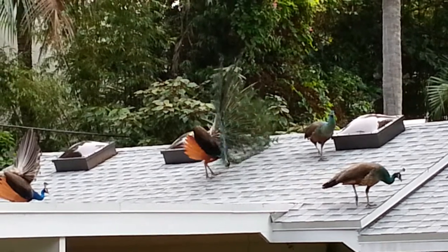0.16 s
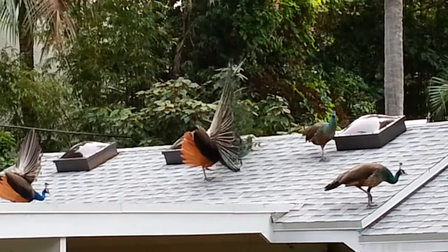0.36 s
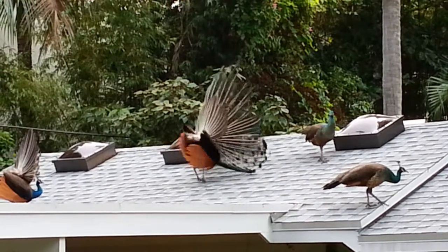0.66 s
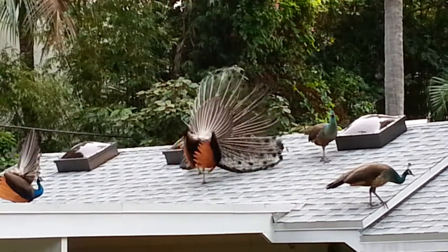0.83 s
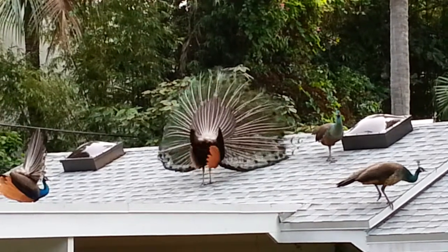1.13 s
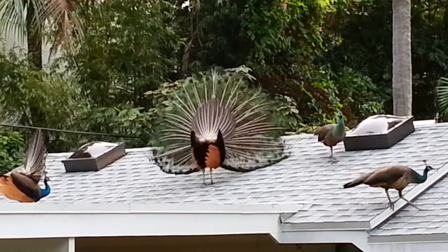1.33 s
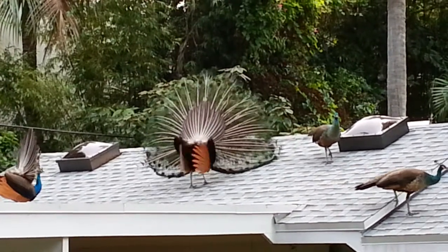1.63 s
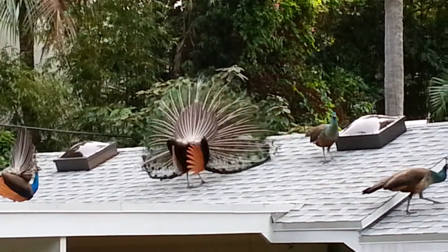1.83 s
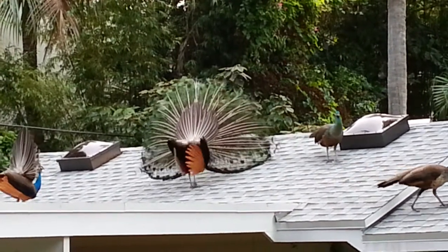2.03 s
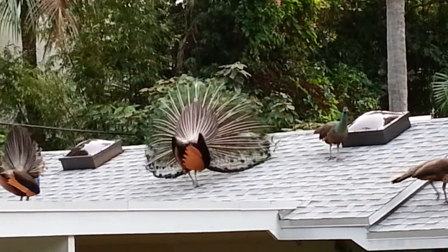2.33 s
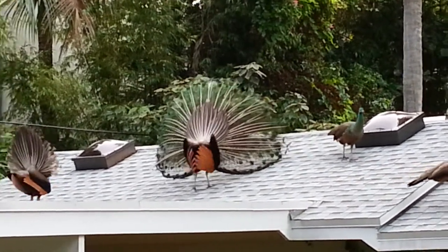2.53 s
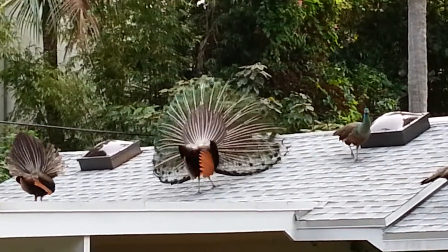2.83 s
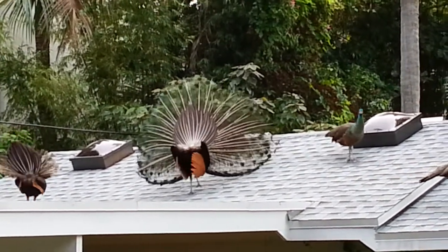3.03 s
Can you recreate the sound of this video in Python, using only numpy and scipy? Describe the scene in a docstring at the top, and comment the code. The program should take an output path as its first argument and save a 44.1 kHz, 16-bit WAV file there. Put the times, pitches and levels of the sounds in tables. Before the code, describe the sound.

Brittle, bright feather rattling comes in uneven short strokes, busy at first, sharpest near the middle with tiny squeaky scrapes, then softer and scattered; quiet outdoor place, slight reflections, low rumble and thin hiss.

```python
"""A peacock turns on a roof with its train fanned: short dry strokes of rustling, with sharp quill snaps.
Rustle is band-split noise and random impulses under stroke envelopes; each snap is a tick with a brief ring.
Filters make this crackle ring near 5 kHz on the left and 7 kHz on the right; decaying noise is its echo.
Modal knocks, squeaking two-tone scrapes and soft bumps of filtered noise join it at moments.
A low noise rumble with a faint hum of sines and a thin noise hiss lie underneath."""
import sys
import numpy as np
from scipy import signal
from scipy.fft import rfft, irfft, next_fast_len
from scipy.io import wavfile
from scipy.ndimage import uniform_filter1d, map_coordinates

SR = 44100
rng = np.random.default_rng(int(sys.argv[2]) if len(sys.argv) > 2 else 0)


def master(y):
    """Save y as 16-bit WAV."""
    cut = np.clip(np.atleast_2d(y).T, -1, 1)
    pcm = np.round(cut * 32767)  # scale
    wavfile.write(sys.argv[1], SR, pcm.astype(np.int16))


N = 140238  # length in samples

# Spectrum of the rumble. Each row: frequency in Hz, relative gain in dB.
RUMBLE_TONE = [(20, -25), (60, -4), (170, -4.5), (315, 1), (420, -6.5), (700, -12), (5000, -52)]
# Spectra of the hiss on each side. Each row: frequency in Hz, relative gain in dB.
HISS_LEFT_TONE = [(200, -1.5), (900, -1), (1700, 2), (2800, -7.5), (4000, -5.5), (4800, 1), (5800, -1),
                  (6800, -7.5), (14500, -11.5)]
HISS_RIGHT_TONE = [(200, -8.5), (2800, -8), (5000, -6), (7000, 3), (8500, -8.5), (14500, -12.5)]
# Partials of the hum. Each row: frequency in Hz, mean rms level in dB.
HUM_PARTIALS = [(119.5, -67), (272.5, -70.5), (480, -75.5)]
RUMBLE_DB, HISS_DB = -60.5, -53.5
LOW_WIDTH = 0.2071  # side signal relative to mid in the low noises
HUM_WAVER_DB, HUM_DRIFT_RAD, RUMBLE_WAVER_DB = 3.5, 1.05, 1.6

# Rustling strokes. Each row: start in seconds, time from start to release in seconds,
# relative level in dB, extra level of the body band in dB.
RUSTLE_STROKES = [(0.167, 0.0697, -50, 0.5), (0.275, 0.05092, -41.5, -4.5), (0.31, 0.06464, -48, -1),
                  (0.366, 0.01312, -40, -1.5), (0.42, 0.05263, -48.5, 1.5), (0.478, 0.00839, -35, -9),
                  (0.487, 0.12018, -48.5, 4.5), (0.525, 0.010825, -37.5, -4), (0.614, 0.07387, -51, 1.5),
                  (0.657, 0.01488, -41.5, -3.5), (0.697, 0.0443, -45.5, 4.5), (0.765, 0.05094, -40.5, -2),
                  (0.813, 0.05986, -49, 1.5), (0.901, 0.0669, -53, -6), (1.043, 0.08417, -51, 4.5),
                  (1.205, 0.01925, -47.5, 6), (1.226, 0.01874, -30.5, -7.5), (1.243, 0.027235, -51, 7.5),
                  (1.302, 0.0694, -50.5, -0.5), (1.333, 0.00979, -42.5, -19.5), (1.485, 0.03506, -48.5, 2),
                  (1.506, 0.005884, -29.5, 2.5), (1.512, 0.01847, -41.5, 7), (1.538, 0.010335, -36.5, 4),
                  (1.56, 0.006995, -39.5, 11.5), (1.566, 0.02481, -47.5, 8.5), (1.647, 0.07375, -46.5, 0.5),
                  (1.789, 0.022856, -50, -0.5), (1.851, 0.14213, -53, -7.5), (1.89, 0.03289, -49, 3.5),
                  (2, 0.018043, -39, -0.5), (2.149, 0.0346, -51, 0), (2.191, 0.02946, -45.5, 0),
                  (2.322, 0.03531, -47, 2), (2.472, 0.05828, -49.5, 3), (2.488, 0.024024, -40.5, -3),
                  (2.639, 0.02951, -51.5, 7.5), (2.681, 0.07537, -48, -0.5), (2.778, 0.027484, -44.5, 7.5),
                  (2.802, 0.02996, -43.5, -12.5), (2.838, 0.10906, -46.5, 0.5), (2.997, 0.08126, -52, 0.5),
                  (3.081, 0.08473, -56.5, 3.5)]
STROKE_ATTACK_S, STROKE_RELEASE_S = 0.005157, 0.005804
STROKE_DB, BODY_DB, BODY_HZ = -1, -1, 2740.6  # the body is the band below BODY_HZ
GRAINS_PER_S, GRAIN_SPREAD_DB, FLUTTER_DB = 2400, 4.1, 1.2
SMOOTH_SHARE, SIDES_SHARE = .45, .35  # power shares: smooth hiss in the grains, noise common to both sides
PATCHY_DB = 2

# Quill snaps. Each row: start in seconds, relative level in dB, left over right in dB before the side colour.
QUILL_SNAPS = [(.1765, -35, 4), (.2968, -23.5, -7), (.3040, -33.5, 1), (.3150, -32, 0.5), (0.3245, -37, -4),
               (0.3745, -27, -7.5), (0.4272, -40.5, -11.5), (.4838, -27, -2), (0.4928, -27.5, 5),
               (0.5305, -28.5, -5), (.59, -31, -0.5), (0.67, -32.5, -6.5), (.7373, -30.5, -1),
               (0.7689, -29, -1.5), (0.8115, -29, -2), (1.063, -40, 15.5), (1.509, -28, -6.5),
               (1.7103, -39, 7.5), (1.7935, -42, -5), (1.8547, -43, -4.5), (1.91, -36.5, -13.5),
               (2.0042, -38, -8.5), (2.156, -44.5, 3), (2.2129, -34, 6.5), (2.3299, -37.5, 9),
               (2.6549, -34.5, -6)]
# Spectral tilt of the snaps. Each row: frequency in Hz, gain in dB.
SNAP_TONE = [(200, -12), (2500, -9.5), (4500, 1), (6500, 0.5), (9000, 0.5), (14000, 0)]
SNAP_CRUMBLE, QUILL_RING = 1.8, .55  # amplitudes against the tick, before the sum is levelled
SNAP_T60_S, QUILL_HZ, QUILL_SPREAD = .011, 5800, .25  # spread in natural-log frequency

# Colour of the crackle on each side. Each row: frequency in Hz, gain in dB.
LEFT_COLOUR = [(60, -1.5), (300, -5), (1000, 0.5), (1700, 0), (2800, -4.5), (3900, -5.5), (4500, 3.5),
               (5200, 9.5), (5500, 2), (5850, 4), (6300, 2.5), (6900, -28.5), (7800, -1.5), (8700, -13),
               (10000, -12), (14500, -21.5)]
RIGHT_COLOUR = [(60, -18), (300, -9.5), (900, -8), (2800, -5), (4200, -5), (5000, -0.5), (5800, 0.5),
                (6700, 11), (7350, 8), (7850, 3), (8300, 3), (9500, -6.5), (11500, -5.5), (14500, -14)]
ECHO_T60_S = 0.3559
ECHO_DB, SNAP_ECHO_DB, HIT_ECHO_DB = -5, -8, -12.5  # strokes, snaps, then knocks and scrapes

# Soft bumps. Each row: start in seconds, time from start to release in seconds, relative level in dB.
SOFT_BUMPS = [(.305, 0.02394, -53.5), (.468, 0.03685, -52), (.73, 0.1034, -58), (1.175, 0.08835, -57.5),
              (1.485, 0.11372, -54.5), (2.2, 0.01136, -52.5), (2.428, 0.04088, -52.5), (2.77, 0.03733, -51)]
# Spectrum of the bumps. Each row: frequency in Hz, relative gain in dB.
BUMP_SPECTRUM = [(25, -29.5), (60, 3.5), (120, 1.5), (300, 4.5), (1100, -11.5), (6000, -67)]
BUMP_ATTACK_S, BUMP_RELEASE_S = 0.001817, 0.01462

# Hollow knocks. Each row: start in seconds, relative level in dB.
HOLLOW_KNOCKS = [(0.7376, -53), (1.566, -46.5), (2.4306, -56), (2.7843, -44.5), (2.7925, -49), (2.799, -54)]
# Resonant modes of the knocks. Each row: frequency in Hz, mean relative level in dB, 60 dB decay in seconds.
HOLLOW_MODES = [(274.97, -0.5, 0.0827), (517.24, -2, 0.03447), (757, -2.5, 0.0208), (1044.4, 1, 0.05857),
                (1608.4, -9, 0.03013)]
KNOCK_RIGHT_DB = -3.5

# Squeaking scrapes. Each row: start in seconds, time from start to release in seconds, relative level in dB.
SQUEAK_SCRAPES = [(1.508, 0.00582, -29.5), (1.543, 0.004766, -34), (1.5605, 0.001652, -32),
                  (1.5662, 0.002437, -33)]
SCRAPE_ATTACK_S, SCRAPE_RELEASE_S = 0.000681, 0.00186
SCRAPE_LEFT_HZ, SCRAPE_RIGHT_HZ, SCRAPE_ROUGH_RAD = 5181, 7200, 1.4655
SCRAPE_RIGHT_DB, SCRAPE_SPILL_DB = -3.5, -8
TOP_HZ = 14750


def amp(db):
    """Logarithmic level: decibels become an amplitude ratio."""
    return 10 ** (np.asarray(db) / 20)


def unit(x):
    """Power normalization: the signal is scaled to rms 1."""
    return x / np.sqrt(np.mean(x ** 2) + 1e-20)


def even(x):
    """Energy normalization: each channel is scaled to energy 1."""
    return x / np.linalg.norm(x, axis=-1, keepdims=True)


def along(points, hz):
    """Interpolation of (Hz, value) points on a logarithmic frequency axis."""
    f, v = np.transpose(points)
    return np.interp(np.log(hz + 1), np.log(f + 1), v)


def wobble(rate):
    """Smooth random modulation: a spline through Gaussian knots, rate knots a second."""
    knots = rng.standard_normal(int(N * rate / SR) + 4)
    return map_coordinates(knots, [np.arange(N) * rate / SR])


def coloured(x, points):
    """Minimum-phase filtering: a folded cepstrum turns (Hz, dB) points into a causal filter."""
    m = 2 * next_fast_len(N // 2 + SR // 4)
    gain = amp(along(points, np.fft.rfftfreq(m, 1 / SR)))
    cepstrum = irfft(np.log(gain), m)
    cepstrum[1:m // 2] *= 2
    cepstrum[m // 2 + 1:] = 0
    return irfft(rfft(x, m) * np.exp(rfft(cepstrum)), m)[..., :N]


def swells(rows, attack, release):
    """Envelopes added in power: linear attack, hold, exponential release with the given time constant."""
    power, t = np.zeros(N + SR), np.arange(SR // 2) / SR
    for start, length, db in rows:
        shape = np.minimum(t / attack, 1) * np.exp(-np.maximum(t - length, 0) / release)
        power[int(start * SR):][:len(t)] += (amp(db) * shape) ** 2
    return np.sqrt(power[:N])


def pair(size):
    """Partial correlation: two white noises, left and right, share SIDES_SHARE of their power."""
    z = rng.standard_normal((3, size))
    return np.sqrt(SIDES_SHARE) * z[0] + np.sqrt(1 - SIDES_SHARE) * z[1:]


def low_noise(tone):
    """Mid-side synthesis: a weak side signal leaves filtered noise nearly mono, at rms 1."""
    mid, side = coloured(rng.standard_normal((2, N)), tone)
    return unit(np.array([mid + LOW_WIDTH * side, mid - LOW_WIDTH * side]))


def background():
    """Steady sources: filtered-noise rumble and hiss, and hum partials wavering in level and phase."""
    t = np.arange(N) / SR
    hum = 0
    for hz, db in HUM_PARTIALS:
        level = np.sqrt(2) * amp(db + HUM_WAVER_DB * wobble(9.6))
        hum = hum + level * np.sin(2 * np.pi * hz * t + HUM_DRIFT_RAD * wobble(9))
    hiss = np.array([coloured(rng.standard_normal(N), tone) for tone in (HISS_LEFT_TONE, HISS_RIGHT_TONE)])
    rumble = amp(RUMBLE_DB + RUMBLE_WAVER_DB * wobble(7.4282)) * low_noise(RUMBLE_TONE)
    return hum + rumble + amp(HISS_DB) * hiss


def grains():
    """Friction as impulse noise: dense tiny slips of uneven size on a smooth hiss."""
    slips = rng.random(N) < GRAINS_PER_S / SR
    sizes = slips * amp(GRAIN_SPREAD_DB * np.minimum(rng.exponential(size=N), 4))
    return np.sqrt(1 - SMOOTH_SHARE) * unit(sizes * pair(N)) + np.sqrt(SMOOTH_SHARE) * pair(N)


def grain_band(kind):
    """Band splitting: a fresh shower of grains above or below BODY_HZ."""
    return signal.sosfilt(signal.butter(3, BODY_HZ, kind, fs=SR, output="sos"), grains())


def rustle():
    """Modulated friction noise: each stroke is a fluttering shower of slips with its own share of body."""
    top_rows = [(start, length, db) for start, length, db, _ in RUSTLE_STROKES]
    body_rows = [(start, length, db + extra) for start, length, db, extra in RUSTLE_STROKES]
    flutter = amp(STROKE_DB + FLUTTER_DB * wobble(130))
    top = swells(top_rows, STROKE_ATTACK_S, STROKE_RELEASE_S) * grain_band("high")
    body = swells(body_rows, STROKE_ATTACK_S, STROKE_RELEASE_S) * grain_band("low")
    return flutter * (top + amp(BODY_DB) * body)


def patchy(x):
    """Time-varying spectrum: a smoothed random gain field shifts the colour from moment to moment."""
    z = signal.stft(x, nperseg=128)[2]
    field = uniform_filter1d(rng.standard_normal(z.shape[1:]), size=4, axis=0)  # over frequency
    field = uniform_filter1d(field, size=9, axis=1)  # over time
    return signal.istft(z * amp(PATCHY_DB * unit(field)), nperseg=128)[1][:, :N]


def snaps():
    """Impulsive release: a quill lets go with a tick, a little crumbling and a brief ring at its own pitch."""
    out, t = np.zeros((2, N + SR)), np.arange(SR // 20) / SR
    dying = amp(-60 * t / SNAP_T60_S)
    for start, db, pan_db in QUILL_SNAPS:
        pitch = QUILL_HZ * np.exp(QUILL_SPREAD * rng.standard_normal())
        ring = even(np.sin(2 * np.pi * pitch * t) * dying)
        crumble = even(pair(len(t)) * dying)
        snap = even((t == 0) + SNAP_CRUMBLE * crumble + QUILL_RING * ring)
        snap = snap * np.sqrt(SR / 1000)  # energy of one millisecond at rms 1
        out[:, int(start * SR):][:, :len(t)] += snap * amp(db + np.array([[pan_db], [-pan_db]]) / 2)
    return coloured(out[:, :N], SNAP_TONE)


def echo(x):
    """Diffuse reverberation: nearby walls answer with a short tail of exponentially decaying noise."""
    t = np.arange(SR // 2) / SR
    tail = rng.standard_normal((2, len(t))) * amp(-60 * t / ECHO_T60_S)
    return signal.fftconvolve(x, tail / np.linalg.norm(tail[0]), axes=1)[:, :N]


def bumps():
    """Damped soft impacts: short envelopes on low, nearly mono noise."""
    return swells(SOFT_BUMPS, BUMP_ATTACK_S, BUMP_RELEASE_S) * low_noise(BUMP_SPECTRUM)


def knocks():
    """Modal resonance: hollow knocks, likely feet on the roof, ring the same modes a little differently."""
    out, t = np.zeros(N + SR), np.arange(SR // 10) / SR
    for start, db in HOLLOW_KNOCKS:
        for hz, mode_db, t60 in HOLLOW_MODES:
            decay = amp(db + mode_db + rng.normal(0, 1.612) - 60 * t / t60)
            out[int(start * SR):][:len(t)] += decay * np.sin(2 * np.pi * (hz * t + rng.random()))
    return np.array([out[:N], amp(KNOCK_RIGHT_DB) * out[:N]])


def squeak(hz):
    """Phase modulation: a sine of rms 1 roughened by a fast random phase."""
    t = np.arange(N) / SR
    return np.sqrt(2) * np.sin(2 * np.pi * hz * t + SCRAPE_ROUGH_RAD * wobble(650))


def scrapes():
    """Brittle resonance: hard brief rubs squeak low on the left, and high with some of the low on the right."""
    low, high = squeak(SCRAPE_LEFT_HZ), squeak(SCRAPE_RIGHT_HZ)
    right = amp(SCRAPE_RIGHT_DB) * high + amp(SCRAPE_SPILL_DB) * low
    return swells(SQUEAK_SCRAPES, SCRAPE_ATTACK_S, SCRAPE_RELEASE_S) * np.array([low, right])


def scene():
    """Superposition: crackle and echo, coloured on each side, over scrapes, knocks, bumps and background."""
    strokes, ticks, hits = patchy(rustle()), snaps(), scrapes() + knocks()
    left, right = strokes + ticks + amp(ECHO_DB) * echo(strokes) + amp(SNAP_ECHO_DB) * echo(ticks)
    crackle = np.array([coloured(left, LEFT_COLOUR), coloured(right, RIGHT_COLOUR)])
    return crackle + hits + amp(HIT_ECHO_DB) * echo(hits) + bumps() + background()


def record(dry):
    """Band limitation: every component from TOP_HZ upward is removed."""
    m = next_fast_len(N + SR // 2)
    return irfft(rfft(dry, m) * (np.fft.rfftfreq(m, 1 / SR) < TOP_HZ), m)[:, :N]


dry = scene()
out = record(dry)
master(out)
```